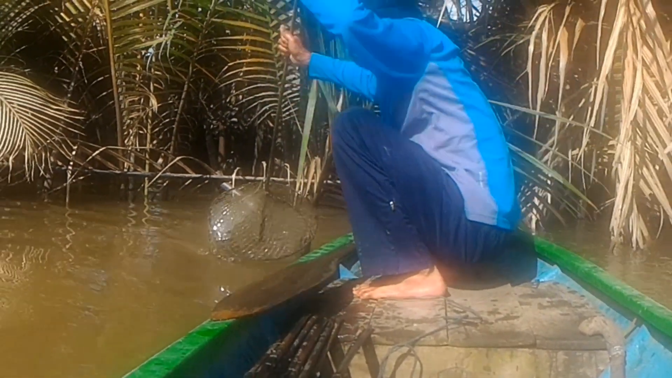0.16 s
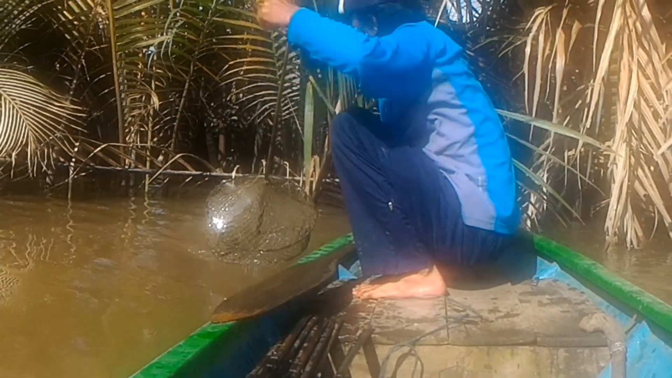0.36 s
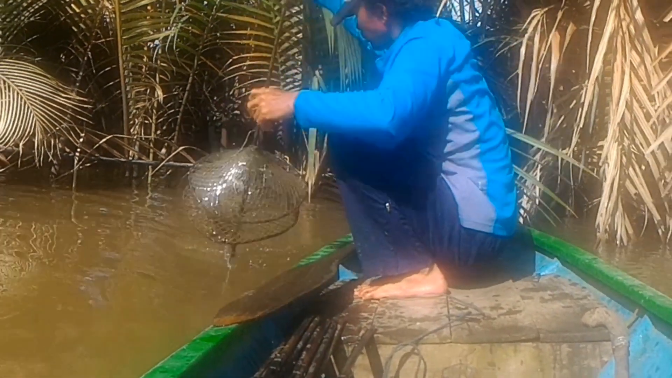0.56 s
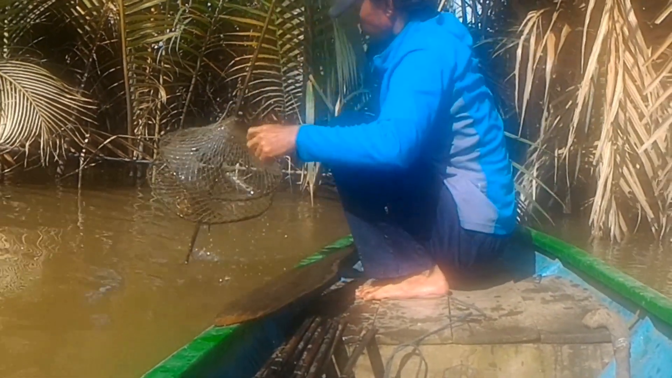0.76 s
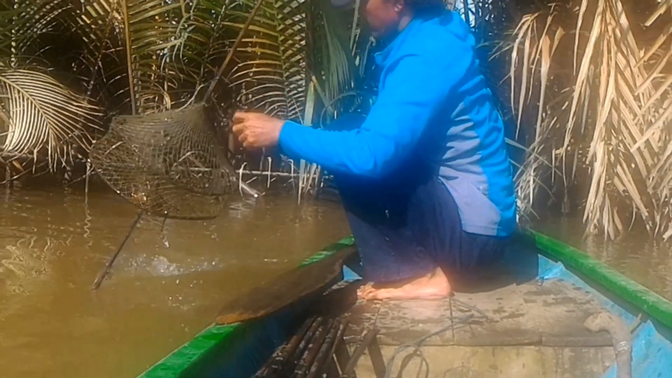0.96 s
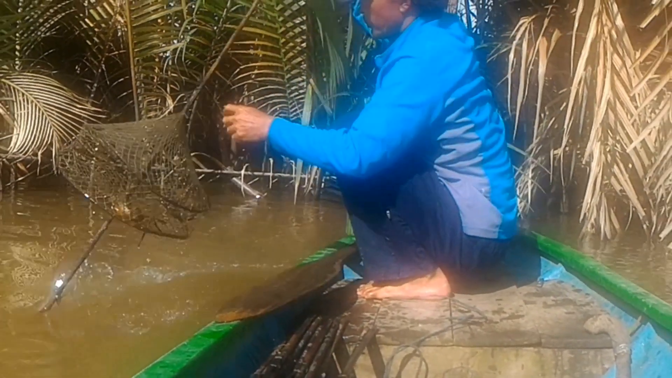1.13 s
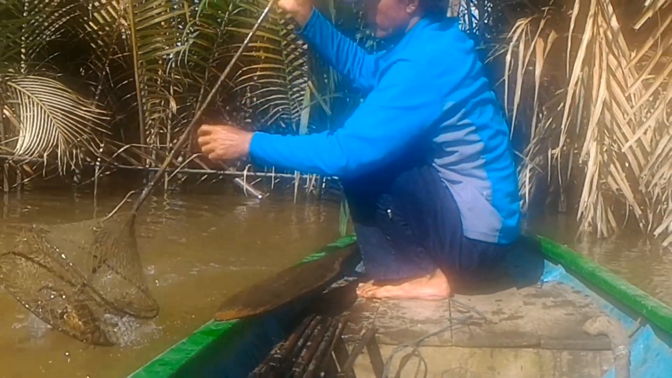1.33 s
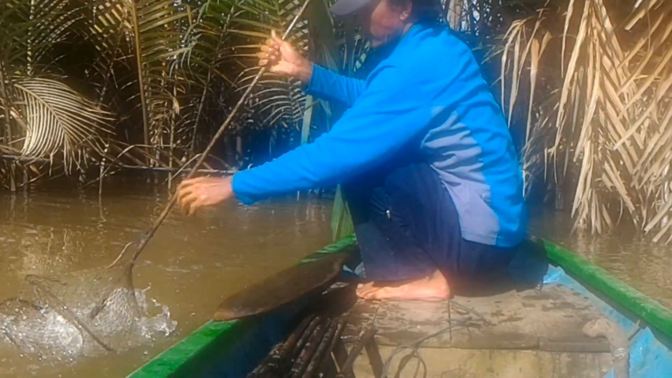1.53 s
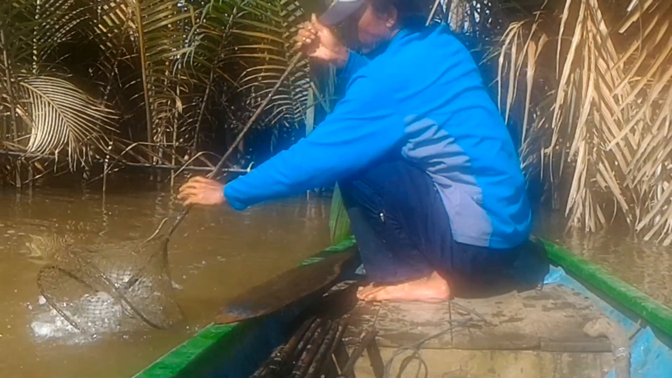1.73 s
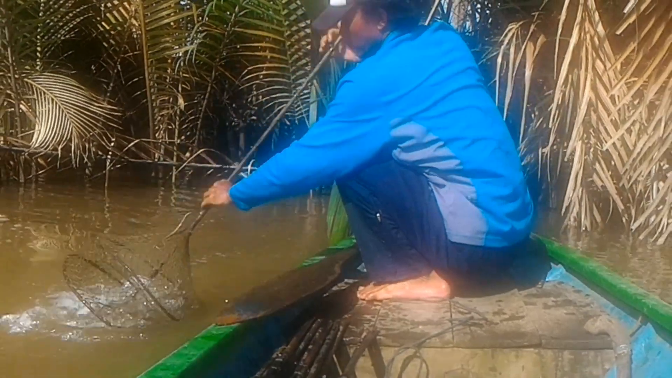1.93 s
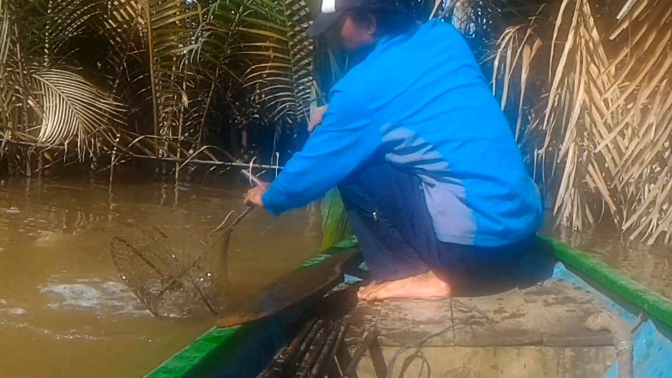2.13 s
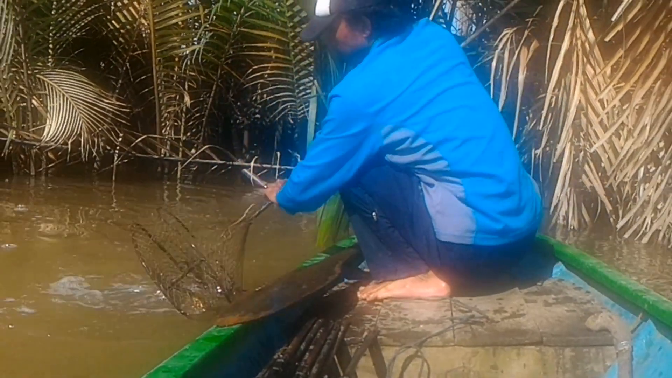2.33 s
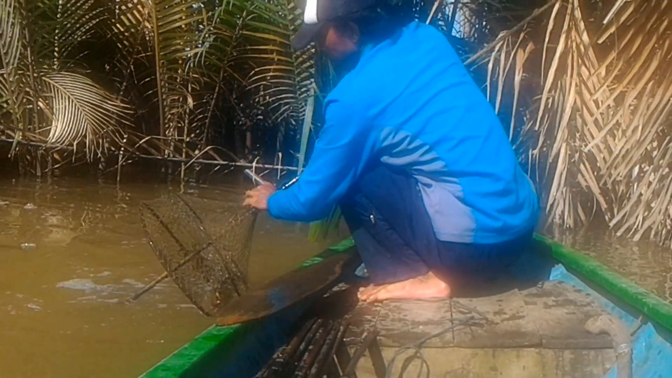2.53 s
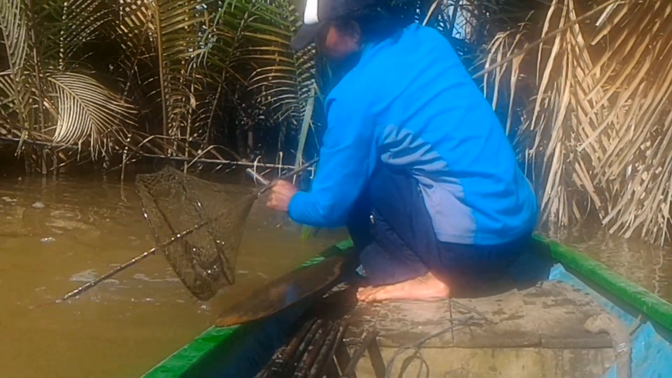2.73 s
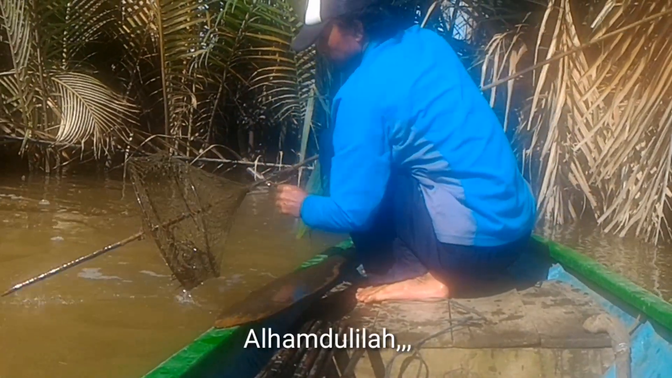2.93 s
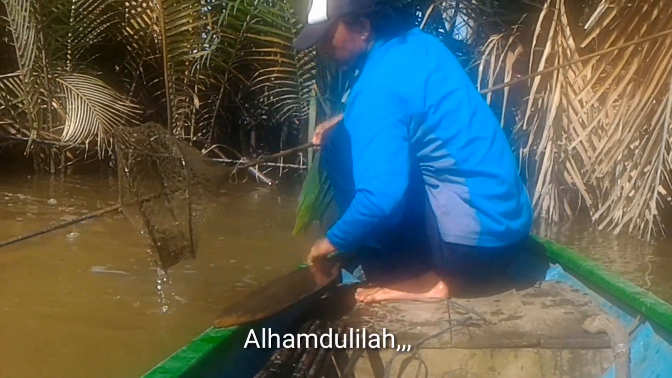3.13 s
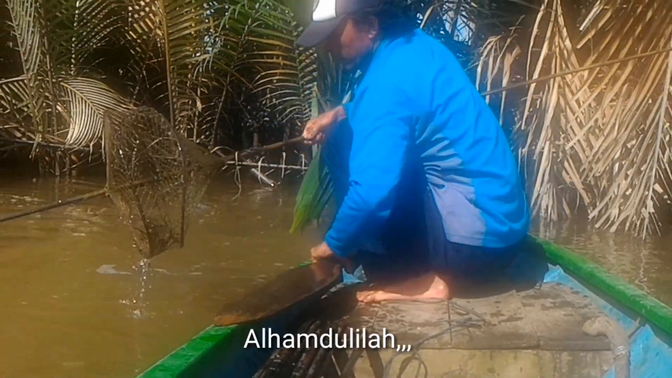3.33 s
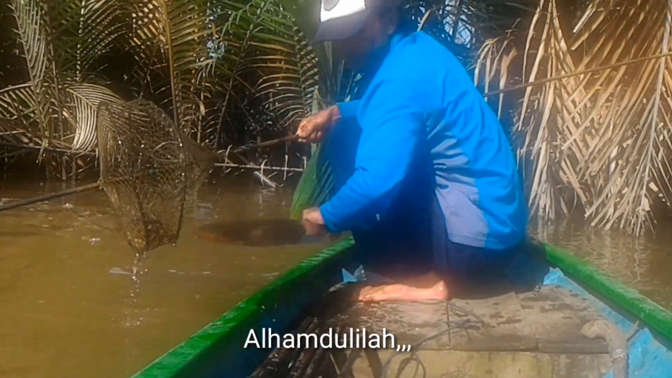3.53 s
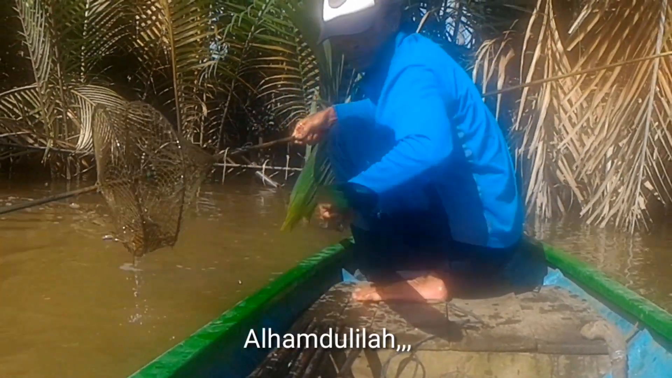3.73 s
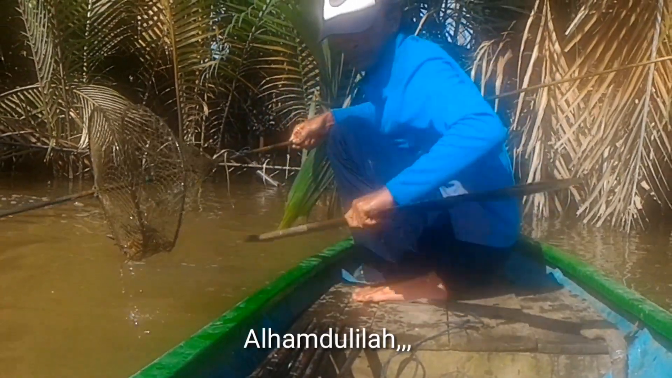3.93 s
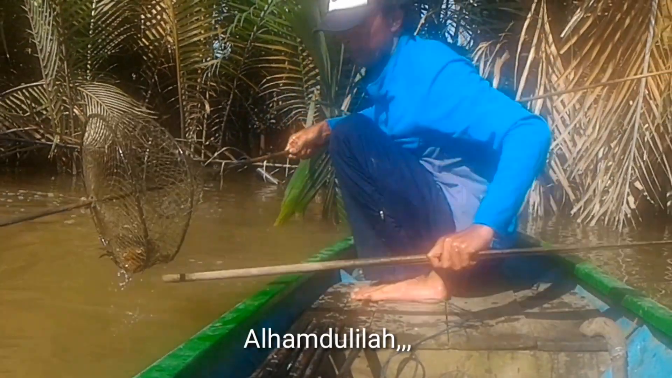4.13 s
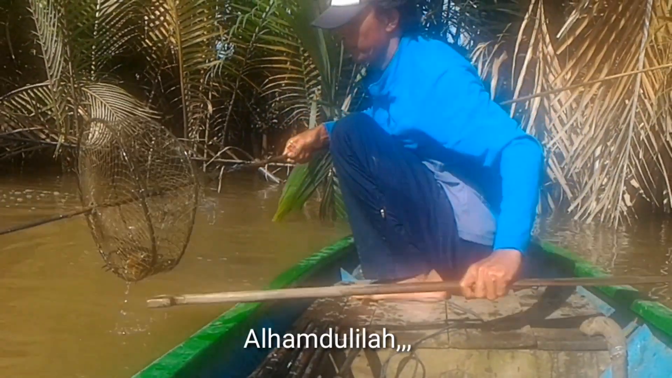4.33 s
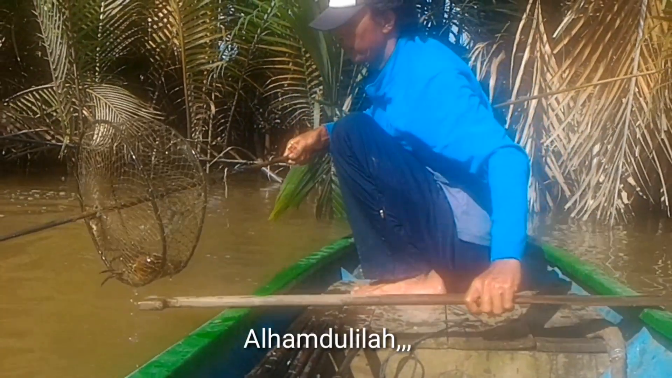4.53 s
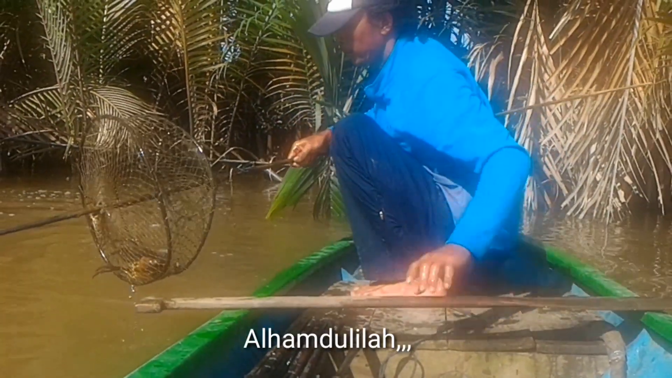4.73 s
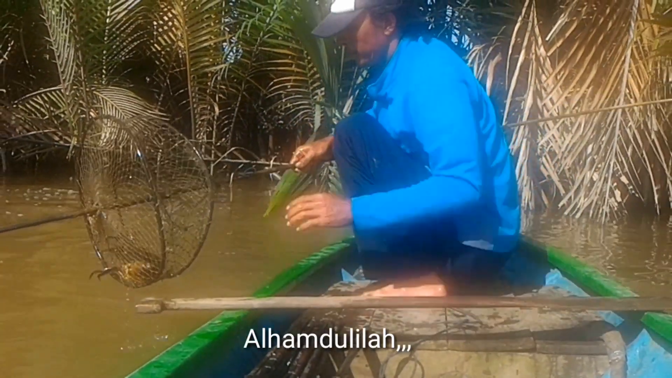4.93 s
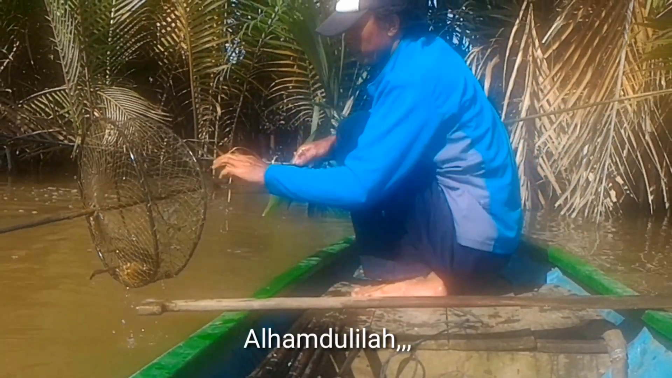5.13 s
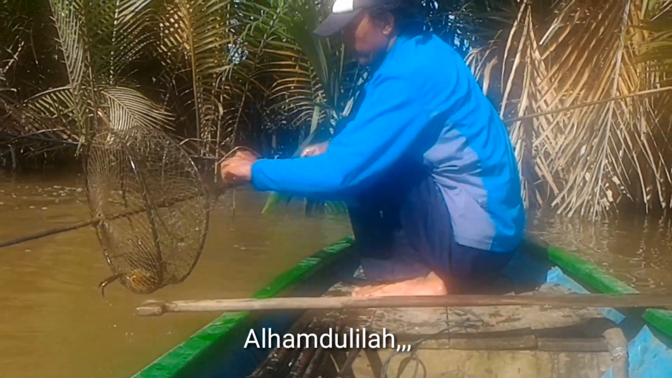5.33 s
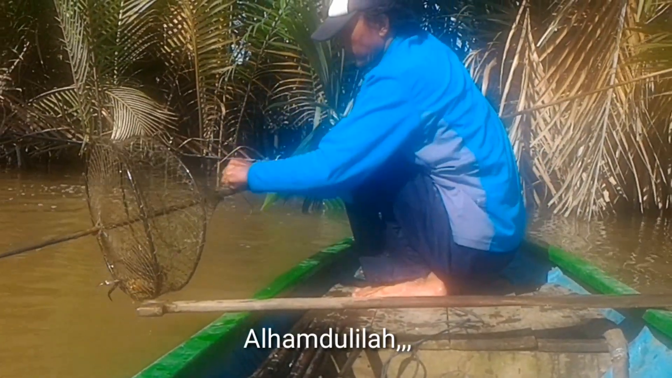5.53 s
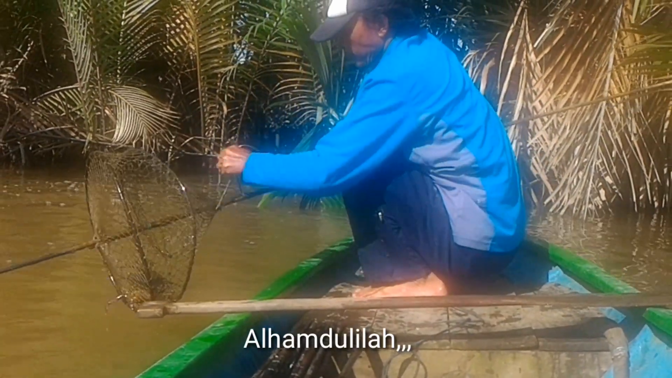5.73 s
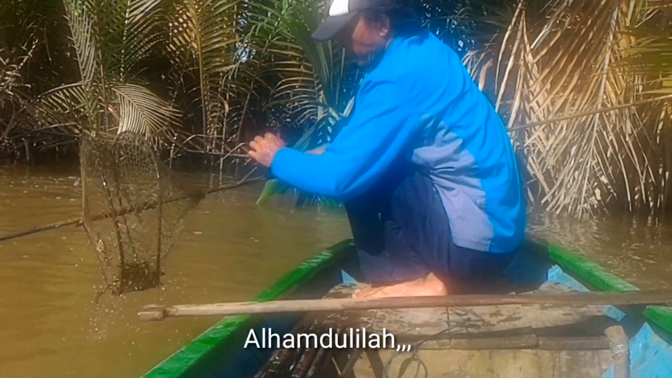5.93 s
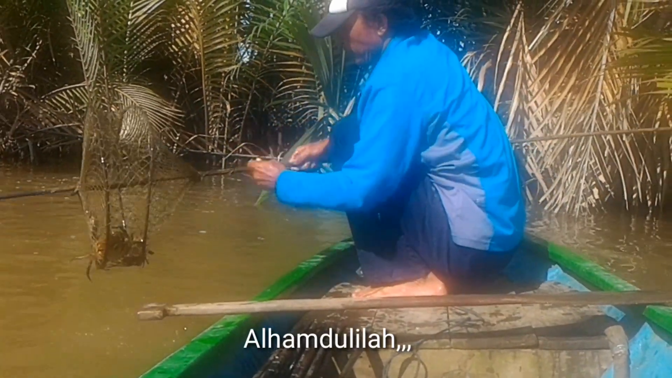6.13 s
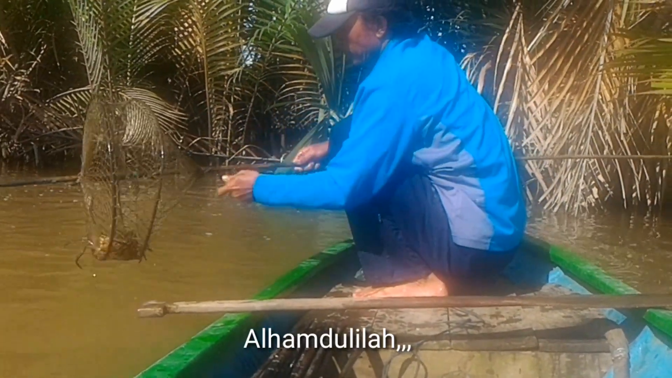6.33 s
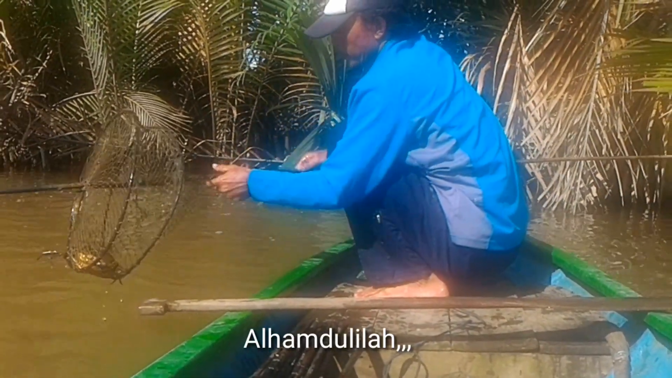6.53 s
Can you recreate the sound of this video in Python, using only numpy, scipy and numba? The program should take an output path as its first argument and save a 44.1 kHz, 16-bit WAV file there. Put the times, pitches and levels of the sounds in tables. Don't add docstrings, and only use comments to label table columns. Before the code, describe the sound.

Close to a small onboard microphone, light trickling and droplet ticks lead to one brief, bright splash with gurgling air pockets. The raised net drips irregularly into the river. Later comes a faint wooden tap, then the loudest event, a quick pair of hard knocks with a deep hollow thump. Afterwards only stray drips and crisp spatters remain over soft hiss and uneven low boat rumble.

```python
import sys
import numpy as np
from scipy import signal
from scipy.io import wavfile
from scipy.ndimage import uniform_filter1d
from numba import njit

SR = 44100
rng = np.random.default_rng(int(sys.argv[2]) if len(sys.argv) > 2 else 0)


def dump_mix(stems):
    frames = np.atleast_2d(stems).T
    limited = np.clip(frames, -1, 1)
    pcm = np.round(limited * 32767).astype(np.int16)
    wavfile.write(sys.argv[1], SR, pcm)


def voltage_ratio(decibels):
    exponent = np.asarray(decibels, float) / 20
    return 10 ** exponent


N = 294577

# start in seconds, hold in seconds, spray level in dB, depth in dB.
WATER_SURGES = [(0.029, .005, -65, 7), (0.015, .25, -89, 20), (0.235, .02, -59, 0), (0.267, 0.068, -52, 0),
                (0.348, 0.054, -50.5, -2), (0.324, 0.25, -87.5, 20), (0.819, 0.035, -59, -3),
                (1.098, 0.025, -54, 1.5), (1.281, .017, -41, -12), (1.305, 0.018, -36, -6),
                (1.329, 0.02, -41, 3.5), (1.368, 0.021, -44, 8.5), (1.405, 0.014, -42.5, 3),
                (1.471, 0.026, -49.5, 7), (1.553, 0.017, -57, 3), (1.619, .05, -84.5, 19.5),
                (1.7, .01, -57, 0), (1.733, .04, -59, 2), (2.123, 0.091, -64, 0), (2.4, 0.0085, -67, -6)]
# start in seconds, peak level in dB, pitch in Hz.
NET_DRIPS = [(2.203, -44, 2200), (2.543, -49.5, 2930), (2.937, -59, 1850), (3.055, -50.5, 574),
             (3.207, -51, 1440), (3.262, -51, 1270), (3.358, -50.5, 2940), (3.379, -49, 3250),
             (3.565, -54, 2200), (3.546, -55, 780), (3.645, -55, 1430), (3.696, -55, 2730),
             (3.775, -50, 2720), (3.872, -58, 726), (4.101, -58, 3030), (4.859, -53, 1400),
             (4.995, -52, 2300), (5.264, -52, 2170), (6.249, -52.5, 2050), (6.505, -53, 1810),
             (6.558, -52, 2470)]
# start in seconds, sharp contact in dB, weight in dB.
POLE_KNOCKS = [
    (4.272, -35.5, -42.5),
    (4.284, -50, -41),
    (4.306, -47, -48),
    (4.406, -53, -63),
    (4.427, -22, -30),
    (4.446, -25.5, -29),
    (4.475, -43, -37.5),
]


def rms_one(x):
    return x / np.sqrt(np.mean(x ** 2) + 1e-20)


def drift(rate_hz):
    r = np.exp(-80 * np.pi * rate_hz / SR)
    white = rng.standard_normal(N // 40 + 2002)
    slow = signal.lfilter([1], [1, -2 * r, r * r], white)[2000:]
    return np.interp(np.arange(N) / 40, np.arange(len(slow)), rms_one(slow))


def level_curve(rows):
    s, level_db = np.transpose(rows)
    return voltage_ratio(np.interp(np.arange(N) / SR, s, level_db, left=-120, right=-120))


def ring(clicks, hz, t60_s):
    r = voltage_ratio(-60 / (t60_s * SR))
    w = 2 * np.pi * hz / SR
    return signal.lfilter([0, np.sin(w)], [1, -2 * r * np.cos(w), r * r], clicks + 1e-18)


def band_pass(x, low_hz, high_hz, order=2):
    return signal.sosfilt(signal.butter(order, [low_hz, high_hz], "band", fs=SR, output="sos"), x)


def banded_noise(spectrum, shared_db, own_db, rate_hz):
    hz, level_db = np.transpose(spectrum)
    octaves = np.log2(hz[-1] / hz[0])
    edges = hz[0] * 2 ** np.arange(0, octaves + .5, .5)
    out = 0
    together = drift(rate_hz)
    white = rng.standard_normal((2, N))
    for k, (low, high) in enumerate(zip(edges, np.minimum(edges[1:], .45 * SR))):
        band = band_pass(white[k % 2], low, high)
        colour_db = np.interp(np.log(low * high) / 2, np.log(hz), level_db)
        flicker_db = shared_db * together + own_db * drift(rate_hz)
        out = out + voltage_ratio(colour_db + flicker_db) * band
    return rms_one(out)


@njit
def add_bubbles(out, start, height, cycles_per_sample, rise, length):
    for e in range(len(start)):
        phase = 0.
        for i in range(min(int(3 * length[e]), len(out) - start[e])):
            age = i / length[e]
            phase += 2 * np.pi * cycles_per_sample[e] * 2 ** (rise[e] * min(age, 1.3))
            envelope = min(12 * age, 1) * np.exp(-1.2 * age ** 1.5)
            out[start[e] + i] += height[e] * np.sin(phase) * envelope


def bubbles(s, height, hz, rise_oct, length_s):
    out = np.zeros(N)
    length = np.maximum(length_s, .0003) * SR
    add_bubbles(out, (s * SR).astype(np.int64), height, hz / SR, rise_oct, length)
    return out


def swarm(count, low_hz, high_hz, cycles, spread_db, clump_db):
    when, pitch, size, climb = rng.random((count, 4)).T
    s = when * (N - 1) / SR
    clump = np.clip(drift(15), -2, 1.5)[(s * SR).astype(int)]
    height = voltage_ratio(-spread_db * np.log(size + 0.037) + clump_db * clump)
    hz = low_hz * (high_hz / low_hz) ** pitch
    length_s = cycles * (.5 + climb) / hz
    return rms_one(bubbles(s, height, hz, 0.27 * climb ** 2, length_s))


def echoes(x, level_db, t60_s):
    age = np.arange(12000) / SR
    fade = voltage_ratio(-60 * age / t60_s) * np.minimum(age / .004, 1)
    scatter = band_pass(rng.standard_normal(len(age)) * fade, 350, 4500, order=1)
    scatter = scatter / np.sqrt(np.sum(scatter ** 2))
    return voltage_ratio(level_db) * signal.fftconvolve(x, scatter)[:N]


def river_bank():
    # frequency in Hz, density in dB per Hz.
    bank_spectrum = [(71, -37), (120, -2), (150, -6.5), (199, -10.5), (271, -11.5), (540, -15), (2150, -20),
                     (3300, -21.5), (5370, -32.5), (8070, -28.5), (10300, -35.5), (12100, -32),
                     (13700, -43), (15500, -43)]
    return voltage_ratio(-61.5) * banded_noise(bank_spectrum, shared_db=0.08, own_db=1.84, rate_hz=9.4)


def hull():
    # time in seconds, rumble level in dB.
    rocking = [(0.0, -55), (0.28, -53.5), (0.52, -61), (0.96, -54), (1.3, -58), (1.42, -50.5), (1.9, -60),
               (2.12, -52), (2.33, -59.5), (2.49, -56), (2.88, -58.5), (3.27, -54.5), (3.5, -58),
               (4.0, -55), (4.7, -55), (4.93, -60), (6.25, -55), (6.68, -55)]
    # frequency in Hz, density in dB per Hz.
    rumble_spectrum = [(8.8, -31), (15, -0.5), (92, -6), (112, -13.5), (134, -31), (190, -6.5),
                       (220, -20.5), (290, -52.5), (480, -120)]
    # start in seconds, peak level in dB, pitch in Hz, t60 in seconds.
    lurches = [(0.095, -29, 43.1, 0.13), (0.145, -34, 40, 0.11), (0.8, -47, 31.7, 0.12),
               (0.979, -42, 26.9, 0.12), (1.223, -40.5, 45.5, 0.18), (2.058, -38.5, 42.5, 0.16),
               (2.14, -36, 29.6, 0.089), (3.869, -38.5, 52, 0.1), (4.141, -30.5, 31.2, 0.17),
               (4.22, -40, 55, 0.12), (5.343, -49, 34.5, 0.13), (0.1, -43, 90, 0.11), (0.38, -50.5, 90, .1),
               (5.03, -48, 85, 0.1), (5.18, -47.5, 80, .14), (5.35, -48.5, 90, .12), (5.52, -48, 80, .12),
               (6.44, -43, 32.8, .12), (6.238, -46, 38, 0.12)]
    # start in seconds, peak level in dB, pitch in Hz, t60 in seconds.
    booms = [(4.277, -39, 265, 0.08), (4.279, -37, 215, .09), (4.283, -40, 450, .04),
             (4.293, -36.5, 320, .1), (4.428, -27, 1047, .04), (4.436, -33, 331, 0.068),
             (4.288, -37, 169.7, .18), (4.33, -39.5, 70, 0.17), (4.37, -37, 32, 0.15),
             (4.432, -32, 283.7, 0.23), (4.435, -24.5, 59, 0.16), (4.445, -24, 141, 0.154),
             (4.459, -30, 139, .1), (4.49, -30, 72.3, 0.19), (4.50, -40.5, 288, 0.1),
             (4.53, -35.5, 44.5, 0.16), (4.585, -42, 268, .14), (4.60, -39.5, 50, 0.17),
             (4.62, -42.5, 110, 0.09), (4.66, -52, 60, 0.11)]
    rumble = banded_noise(rumble_spectrum, shared_db=1.3, own_db=1.34, rate_hz=13.0)
    out = level_curve(rocking) * voltage_ratio(5.0) * rumble
    age = np.arange(SR // 2) / SR
    for s, peak_db, hz, t60_s in lurches + booms:
        at = int(s * SR)
        swell = (1 - np.exp(-age / (.004 + .35 / hz))) ** 2 * voltage_ratio(-60 * age / max(t60_s, .03))
        swing = voltage_ratio(peak_db) * swell / swell.max() * np.sin(2 * np.pi * hz * age)
        out[at:at + len(age)] += swing[:N - at]
    return out


def struck(modes, level_db, late_cycles, grind, grind_s):
    out = np.zeros(N)
    age = np.arange(2000) / SR
    for k, (hz, mode_db, t60_s) in enumerate(modes):
        force = np.zeros(N)
        for (s, *_), knock_db in zip(POLE_KNOCKS, level_db):
            fade = np.exp(-age / grind_s) / np.sqrt(grind_s * SR)
            contact = grind * rng.standard_normal(len(age)) * fade
            contact[0] += (-1) ** k
            at = int((s + late_cycles / hz) * SR)
            force[at:at + len(age)] += voltage_ratio(knock_db + mode_db) * contact
        soft_force = ring(force, hz, 4.2 / hz) * hz / SR
        out += ring(soft_force, hz, t60_s)
    return out


def pole():
    # pitch in Hz, level in dB, t60 in seconds.
    pole_modes = [(508, -12, 0.11), (560, -10, 0.064), (610, 1.5, 0.046), (700, -1, 0.048),
                  (839, -1.5, 0.082), (945, -7, 0.026), (1047, -2.5, 0.046), (1190, -13, 0.024),
                  (1440, -14, .04), (1500, -11, 0.029), (1637, 3, 0.018), (1884, 5.5, 0.013),
                  (2150, 2.5, 0.017), (2380, 4.5, 0.011), (2730, -5, 0.018), (3300, -8, 0.009),
                  (4820, -20, 0.023)]
    # pitch in Hz, level in dB, t60 in seconds.
    hull_modes = [(98, -5.5, 0.19), (165, 0, 0.14), (203, -6, 0.23), (237, -8, .12), (319, -4, 0.11),
                  (359, -8, 0.15), (470, -18, 0.06)]
    _, contact_db, weight_db = np.transpose(POLE_KNOCKS)
    sharp = struck(pole_modes, contact_db - 2.5, late_cycles=0.43, grind=1.46, grind_s=0.0031)
    heavy = struck(hull_modes, weight_db + 12, late_cycles=1.19, grind=0.73, grind_s=0.011)
    return sharp + heavy


def plank_sweeps():
    # start in seconds, peak level in dB, cycles per e-fold of age, fade in seconds.
    chirps = [
        (4.272, -48, 4.4, .004),
        (4.4274, -27.5, 4.8, 0.016),
        (4.4464, -30, 5.5, .009),
    ]
    start_age_s = .0017
    out = np.zeros(N)
    age = np.arange(3000) / SR
    for s, peak_db, cycles, fade_s in chirps:
        at = int(s * SR)
        wave = np.sin(2 * np.pi * cycles * np.log(1 + age / start_age_s))
        envelope = np.minimum(age / .001, 1) * np.exp(-(age / fade_s) ** 2)
        out[at:at + len(age)] += voltage_ratio(peak_db) * envelope * wave
    return out


def spatters():
    # start in seconds, peak level in dB, centre in Hz.
    bright = [(0.0323, -41, 6600), (0.148, -44.5, 4100), (0.7533, -42.5, 6900), (0.826, -44, 7800),
              (0.8356, -41, 7600), (0.9412, -41, 5730), (0.954, -38.5, 4200), (1.1962, -36, 7300),
              (2.1095, -40, 7460), (2.4184, -48.5, 5090), (2.7647, -43, 7100), (2.935, -48.5, 5400),
              (3.3114, -51, 5260), (3.3295, -51, 7820), (3.399, -49.5, 6590), (3.418, -49.5, 7800),
              (3.5646, -51, 3600), (3.6408, -42, 7300), (3.7357, -52.5, 7000), (4.683, -48, 6900),
              (4.798, -53.5, 8370), (5.1144, -49, 4600), (5.3053, -44, 7000), (5.61, -51, 4130),
              (5.7545, -42.5, 6100), (5.9254, -46, 6620), (5.9331, -35, 7700), (5.953, -36, 8160),
              (6.004, -36.5, 8100), (6.0394, -49.5, 8040)]
    # start in seconds, peak level in dB, centre in Hz.
    splats = [(1.281, -40, 3070), (1.3031, -37, 2930), (3.0965, -43, 4050), (3.101, -44, 2220),
              (3.872, -55, 4500), (3.104, -49, 1660), (3.672, -41, 3600), (5.7548, -49, 2530),
              (5.9534, -43.5, 2980), (6.0074, -43.5, 4500)]
    # start in seconds, peak level in dB, centre in Hz, t60 in seconds.
    rattles = [(4.2725, -37.5, 4300, 0.044), (4.2835, -36.5, 3900, 0.034), (4.428, -40, 3100, 0.03),
               (4.4735, -41.5, 4400, 0.034), (4.4844, -46.5, 6300, .037), (4.285, -42, 500, 0.15),
               (4.276, -41, 760, .09), (4.432, -40, 1900, .08), (4.43, -44, 3000, 0.053),
               (4.449, -39.5, 3700, 0.055), (4.29, -49, 2700, 0.19), (6.25, -50.5, 9500, .03),
               (6.559, -57, 7000, .03), (4.272, -41, 2000, 0.028), (3.097, -44.5, 3850, 0.061),
               (2.4, -46, 7600, .02), (6.25, -57, 5000, 0.028), (4.275, -43.5, 7700, 0.077),
               (4.295, -50, 7500, .05), (4.306, -41, 2000, 0.11), (4.429, -28, 1040, 0.055),
               (4.43, -48, 8700, .08), (4.436, -34, 610, 0.17), (4.452, -49.5, 7600, 0.18),
               (4.585, -43, 360, 0.16), (5.756, -40, 8600, 0.057), (1.285, -36, 9400, .12),
               (1.197, -40, 6000, .008)]
    dull = splats + [(s, db - 3, max(hz, 1660)) for s, db, hz in NET_DRIPS]
    bursts = rattles + [(*row, 0.028) for row in bright] + [(*row, 0.026) for row in dull]
    age = np.arange(4000) / SR
    out = np.zeros(N)
    for s, peak_db, hz, t60_s in bursts:
        at = int(s * SR)
        fade = voltage_ratio(-60 * age / max(t60_s, .004)) * np.minimum(age / .0008, 1)
        broad = band_pass(rng.standard_normal(len(age)) * fade, 0.44 * hz, 2.2 * hz)
        puff = rms_one(ring(broad, hz, 7.9 / hz)) + 0.5 * rms_one(broad)
        out[at:at + len(age)] += voltage_ratio(peak_db - 1.0) * puff / np.abs(puff).max()
    return out


def beads():
    # start in seconds, peak level in dB, pitch in Hz.
    dunk_beads = [(1.2748, -40.0, 7309), (1.2801, -37, 4598), (1.2823, -36, 7309), (1.2844, -41.3, 2043),
                  (1.2864, -37.6, 3864), (1.2882, -37.5, 2892), (1.2897, -38.5, 7309), (1.293, -36.2, 4339),
                  (1.2933, -38.0, 3065), (1.2952, -30, 7309), (1.3084, -26, 4095), (1.3097, -33.6, 6897),
                  (1.311, -31.3, 2892), (1.3167, -37.2, 1144), (1.3173, -33, 2060), (1.3268, -36.1, 3647),
                  (1.3346, -33, 2730), (1.341, -35, 2431), (1.3568, -38.6, 4095), (1.3609, -33, 1620),
                  (1.3897, -33, 2165), (1.39, -34.4, 1443), (1.3966, -40, 571), (1.4141, -36.6, 2043),
                  (1.418, -39.3, 8206), (1.4254, -39, 857), (1.433, -39.8, 1370), (1.4803, -46, 650),
                  (1.4816, -36, 4598), (1.4834, -41.3, 3248), (1.5242, -40, 3065), (1.546, -45.7, 4872)]
    # start in
    # seconds, peak level in dB, pitch in Hz.
    loose_beads = [(0.0178, -49, 3441), (0.0337, -45, 6470), (0.2715, -44.7, 2576), (0.2742, -45.7, 3864),
                   (0.278, -45.6, 1717), (0.296, -44.4, 7309), (0.3073, -44.2, 2431), (0.3089, -46.7, 1717),
                   (0.3138, -46.0, 2431), (0.3837, -42.7, 2730), (0.3843, -42, 6897), (0.3916, -44.5, 2892),
                   (0.402, -44.9, 4339), (0.4633, -48, 2043), (0.6033, -52.8, 8206), (0.6137, -47, 5471),
                   (0.7013, -47, 4095), (0.7115, -45, 2892), (0.7914, -48, 8206), (0.827, -44, 7744),
                   (0.8452, -47, 7309), (0.8543, -50.9, 8696), (0.8631, -46, 2576), (0.9205, -52.7, 1019),
                   (0.9434, -47.4, 5471), (0.9509, -46.5, 5471), (1.0255, -51, 2165), (1.0721, -48.6, 5471),
                   (1.0987, -45, 7309), (1.1034, -46.3, 4339), (1.104, -46.1, 2576), (1.1244, -47, 1529),
                   (1.1393, -46.1, 3864), (1.1418, -42, 2165), (1.1515, -49.2, 6509), (1.1782, -45, 1529),
                   (1.197, -40.8, 6897), (1.2115, -47.0, 3065), (1.2153, -45.2, 5797), (1.2373, -48.2, 5797),
                   (1.5646, -50.4, 7744), (1.5701, -42, 2892), (1.5741, -47, 7744), (1.5754, -43, 2294),
                   (1.632, -46, 7309), (1.647, -50.6, 8206), (1.6516, -51, 1430), (1.6693, -51.8, 6509),
                   (1.6985, -49.4, 4095), (1.7351, -45, 5471), (1.7452, -46, 7309), (1.753, -42, 2043),
                   (1.7565, -42, 4872), (1.7666, -44, 6143), (1.9961, -50, 7744),
                   (0.52, -50, 3000), (0.705, -50, 2250), (0.706, -48, 2800), (0.75, -50, 1800),
                   (0.84, -49, 1700), (0.872, -50, 2050), (1.028, -51, 430), (1.772, -46, 3000),
                   (1.776, -47, 1400), (1.865, -49, 2250), (1.878, -51, 3300), (1.924, -51, 2100),
                   (1.955, -52, 4700), (3.102, -45, 2600), (3.107, -46, 1800), (3.889, -52, 1400),
                   (4.2735, -42, 2500), (4.306, -44, 1900), (4.315, -46, 1950), (4.4295, -36, 3200),
                   (4.453, -35, 1800), (4.776, -54, 2800)]
    # start in seconds, peak level in dB, centre in Hz.
    flat_ticks = [(1.024, -47, 1500), (1.734, -46, 2500), (1.7735, -45, 4200), (3.358, -46, 2000),
                  (3.8722, -46, 2000), (3.8724, -48, 4800), (4.4465, -38, 4000), (4.8595, -50, 4200),
                  (4.9955, -47, 3000)]
    s, peak_db, hz = np.transpose(dunk_beads + loose_beads)
    droplets = bubbles(s, voltage_ratio(peak_db + 1), hz, 0.1 + 0 * s, 7.5 / hz)
    tick_s, tick_db, tick_hz = np.transpose(flat_ticks)
    return droplets + bubbles(tick_s, voltage_ratio(tick_db), tick_hz, 0 * tick_s, 1.6 / tick_hz)


def drops():
    # start in seconds, peak level in dB, pitch in Hz.
    lift_drops = [(0.579, -50, 1930), (0.645, -51, 872), (0.691, -45.5, 910), (0.742, -51, 1920),
                  (0.792, -51, 2660), (0.862, -49, 2580), (0.919, -47, 1040), (1.023, -50, 2250),
                  (1.103, -48, 2320), (1.126, -42, 3180), (1.142, -40, 2260), (1.164, -45, 760),
                  (1.182, -43, 3030), (1.249, -39, 1325), (1.238, -41, 1250), (1.522, -34, 960),
                  (1.578, -40.5, 1390), (1.645, -41.5, 1420), (1.934, -50.5, 1250)]
    # start in seconds, peak level in dB, pitch in Hz, rise in octaves, length in seconds.
    plinks = [(1.0738, -28.5, 1545, 0.044, 0.0062), (1.078, -36, 2500, .2, 0.0052),
              (1.165, -49, 784, .1, .015), (1.183, -41, 804, .1, 0.0076), (1.354, -30, 165, 0.13, 0.023),
              (1.355, -38, 280, .1, .015), (1.402, -34, 200, .1, .012), (1.419, -35, 240, .1, .014),
              (1.491, -40.5, 270, .1, 0.028), (1.316, -35, 1170, .1, .008), (1.33, -38, 1000, .15, .008),
              (1.345, -38, 1100, .1, .008), (1.41, -37, 1050, .1, .008), (1.742, -46, 280, .1, .012),
              (1.744, -44, 900, .2, .003), (1.374, -32, 290, 0.092, 0.018), (1.379, -30, 700, .3, 0.015),
              (1.395, -31.5, 165, .1, 0.035), (1.398, -36, 560, 0.1, .012), (1.465, -36, 156, 0.303, 0.071),
              (1.48, -35.5, 610, 0.2, 0.013), (3.057, -51.5, 349, .05, 0.038),
              (3.096, -42, 2600, 0.1, 0.0052), (3.098, -52, 1700, 0.18, 0.011),
              (3.118, -45, 216, .1, 0.038), (3.266, -53, 353, 0.056, .02), (3.666, -35, 1600, 1.2, .0075),
              (3.8722, -44, 770, .05, .007), (3.895, -51, 800, .1, .005), (4.861, -56, 850, .03, .02),
              (4.997, -59, 1560, .02, .018), (3.495, -56, 680, .05, .02), (3.7, -52, 2500, .1, .006)]
    rise_oct, drop_s, drip_s = .1, 0.006, .0042
    small = [(*row, rise_oct, drop_s) for row in lift_drops]
    small += [(*row, rise_oct, drip_s) for row in NET_DRIPS]
    s, peak_db, hz, rise, length_s = np.transpose(small + plinks)
    tick = np.zeros(N)
    tick[(s * SR).astype(int)] = voltage_ratio(peak_db - 9.5) * (hz > 500)
    return bubbles(s, voltage_ratio(peak_db - 2.5), hz, rise, length_s) + ring(tick, 4900, 0.0013)


def slap():
    age = np.arange(N) / SR - 1.29
    high_pass = signal.butter(4, 12300, "high", fs=SR, output="sos")
    hiss = rms_one(signal.sosfilt(high_pass, rng.standard_normal(N)))
    width_s = np.where(age < 0, .012, .016)
    return voltage_ratio(-59) * hiss * np.exp(-(age / width_s) ** 2)


def surges(level_db, lag_s):
    rise_db_per_s, fall_db_per_s = 1300, 238
    t = np.arange(0, N, 64) / SR
    power = 0
    for (s, hold_s, *_), peak_db in zip(WATER_SURGES, level_db):
        age = t - s - lag_s
        rise_db = rise_db_per_s * np.minimum(age, 0)
        fall_db = fall_db_per_s * np.maximum(age - hold_s, 0)
        power = power + voltage_ratio(peak_db + rise_db - fall_db) ** 2
    return np.interp(np.arange(N) / SR, t, np.sqrt(power))


def water():
    # frequency in Hz, density in dB per Hz.
    spray_spectrum = [(410, -40), (700, -39), (1180, -1), (1580, -8), (2130, 3), (2590, -3), (4020, -6),
                      (8600, -11.5), (15500, -34)]
    # time in seconds, flow in dB.
    runoff = [(0.0, -66), (0.2, -59), (0.5, -62.5), (0.88, -61.5), (1.1, -57), (1.25, -53.5), (1.6, -55.5),
              (1.82, -68), (2.4, -74)]
    # time in seconds, dripping level in dB.
    dripping = [(2.0, -73), (2.3, -64), (3.26, -66.5), (3.45, -71.5), (4.03, -70.5), (4.25, -63.5),
                (4.62, -68), (5.0, -78.5), (5.6, -66.5), (6.02, -72.5), (6.68, -74)]
    _, _, spray_db, depth_db = np.transpose(WATER_SURGES)
    flow, trickle = level_curve(runoff), level_curve(dripping)
    spray = np.hypot(flow, surges(spray_db, 0))
    small = np.hypot(flow * voltage_ratio(1.5), surges(spray_db + depth_db, 0))
    gurgle_db = spray_db + 2.12 * depth_db - 11.5
    gurgle = np.hypot(flow * voltage_ratio(-4.5), surges(gurgle_db, lag_s=0.0092))

    sheet = banded_noise(spray_spectrum, shared_db=2.5, own_db=1.0, rate_hz=29)
    fizz = swarm(count=14000, low_hz=2596, high_hz=9240, cycles=7.4, spread_db=3.0, clump_db=5.0)
    fine = swarm(count=5000, low_hz=560, high_hz=2990, cycles=6.9, spread_db=3.0, clump_db=2.5)
    pockets = swarm(count=1600, low_hz=137.5, high_hz=520, cycles=4.0, spread_db=1.5, clump_db=3.5)
    patter = swarm(count=3500, low_hz=1700, high_hz=3670, cycles=8.0, spread_db=4.0, clump_db=0.5)
    mist = swarm(count=6000, low_hz=4030, high_hz=9480, cycles=9.8, spread_db=4.5, clump_db=5.5)

    out = spray * (voltage_ratio(-1.0) * sheet + voltage_ratio(-0.64) * fizz)
    out += small * voltage_ratio(-5.0) * fine
    out += gurgle * voltage_ratio(-4) * pockets
    return out + trickle * (voltage_ratio(-4.0) * patter + voltage_ratio(-5.5) * mist)


def scene():
    near = water() + drops() + spatters() + pole() + beads() + plank_sweeps()
    near = near + echoes(near, level_db=-15, t60_s=0.22)
    near = signal.sosfilt(signal.butter(2, 11000, fs=SR, output="sos"), near)
    return (near + hull() + river_bank() + slap())[None]


def masked_top(x):
    top_filter = signal.butter(6, 12500, "high", fs=SR, output="sos")
    middle_filter = signal.butter(2, [500, 4000], "band", fs=SR, output="sos")
    top = signal.sosfiltfilt(top_filter, x)
    middle = signal.sosfiltfilt(middle_filter, x)
    top_power = uniform_filter1d(top ** 2, 2048)
    under_db = 10 * np.log10(top_power / uniform_filter1d(middle ** 2, 2048))
    kept = voltage_ratio(6 * np.minimum(under_db + 27, 0))
    return x - top * (1 - kept)


def roll_off(x):
    return signal.sosfilt(signal.butter(12, 15740, fs=SR, output="sos"), x)


def record(dry):
    low_pass = signal.ellip(10, 1, 60, 15640, fs=SR, output="sos")
    mix = masked_top(signal.sosfilt(low_pass, dry))
    return roll_off(mix)


dry = scene()
out = record(dry)
dump_mix(out)
```